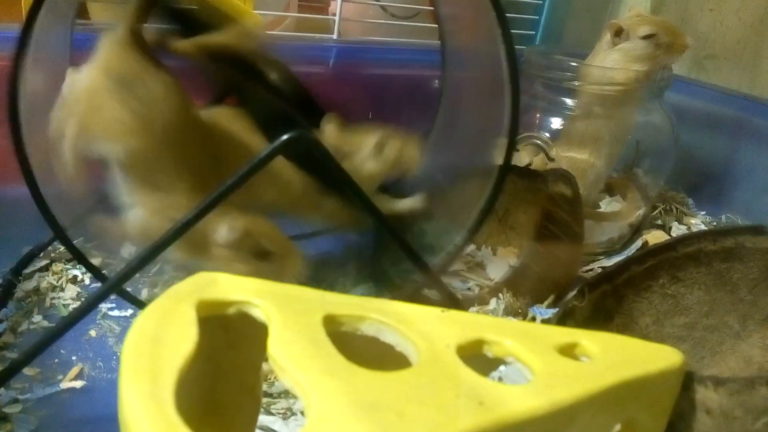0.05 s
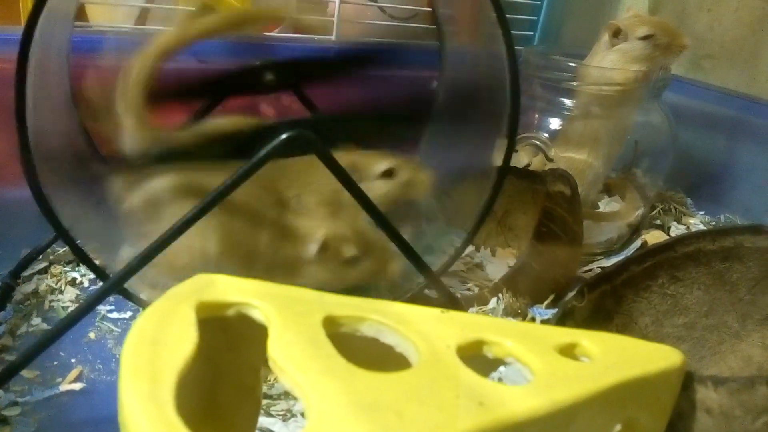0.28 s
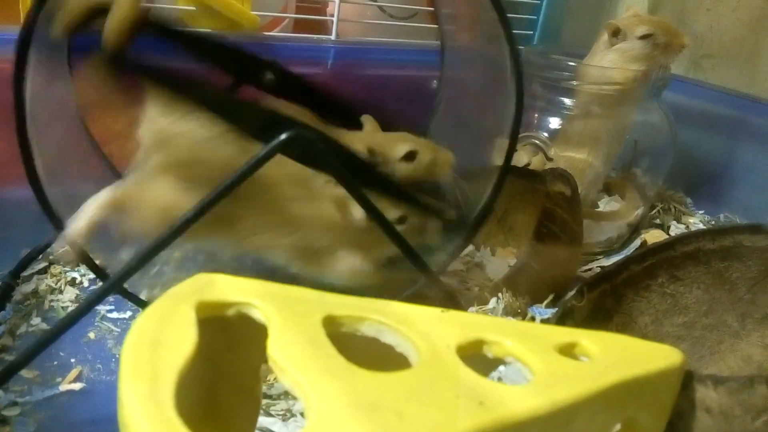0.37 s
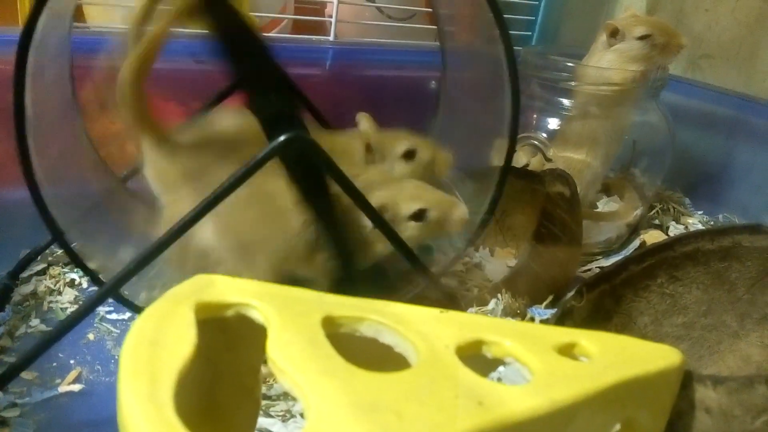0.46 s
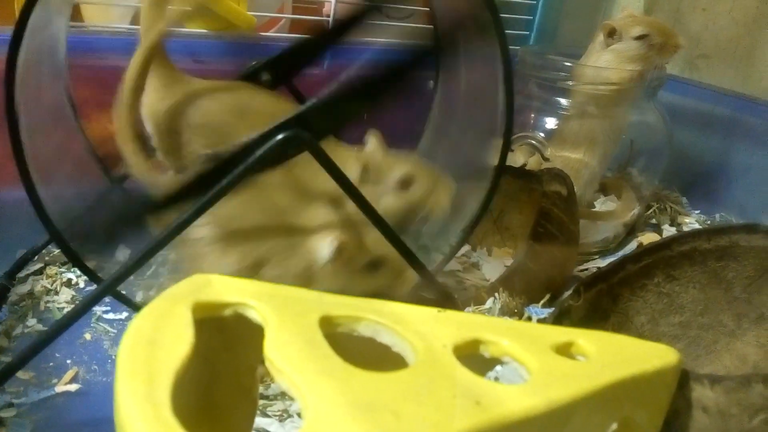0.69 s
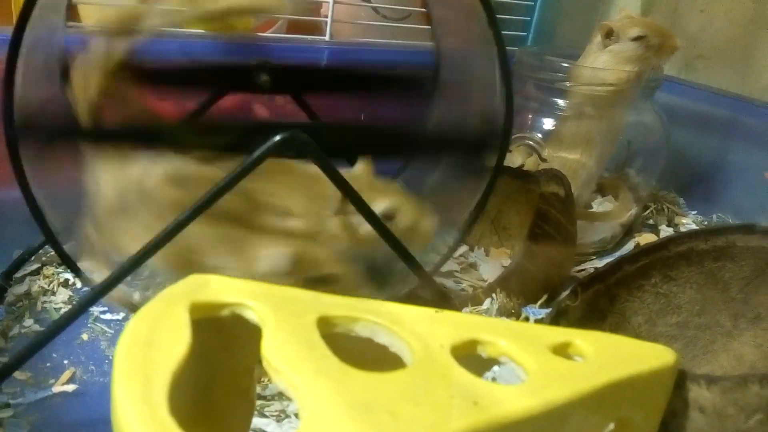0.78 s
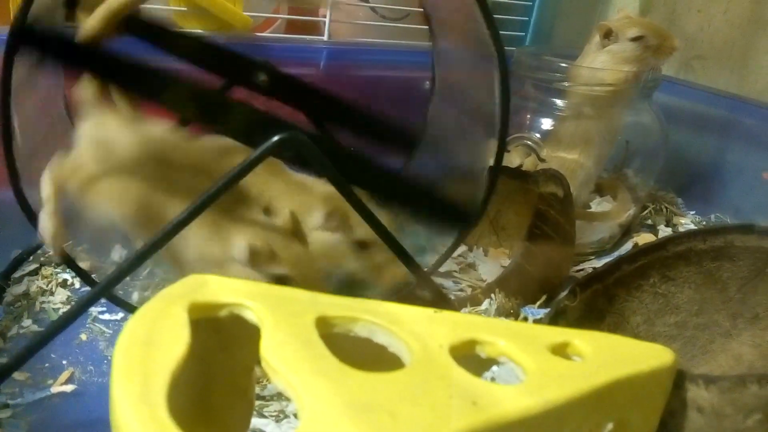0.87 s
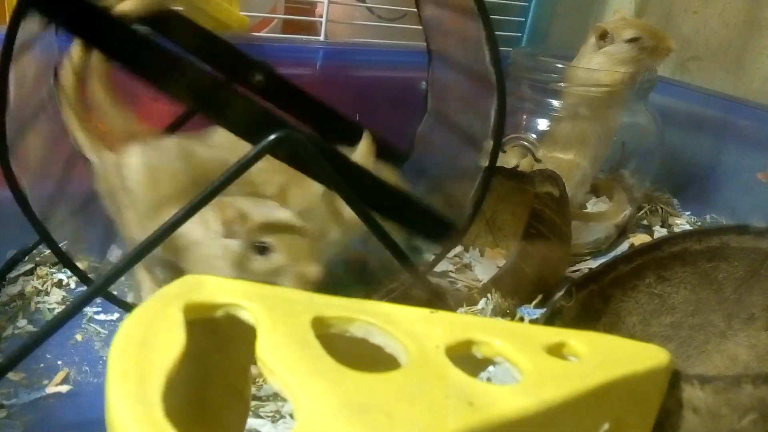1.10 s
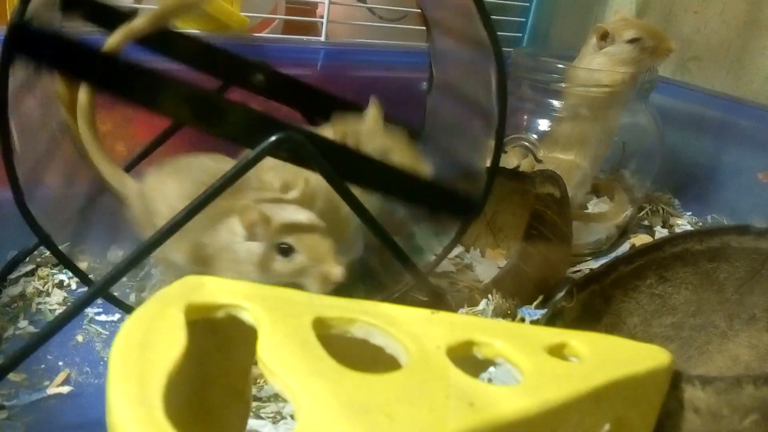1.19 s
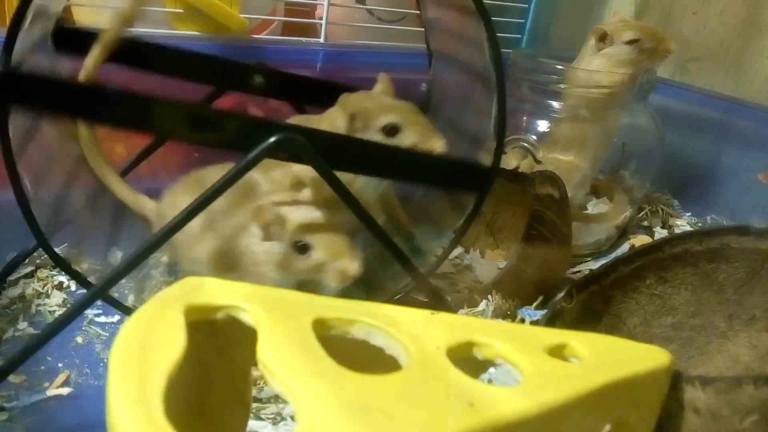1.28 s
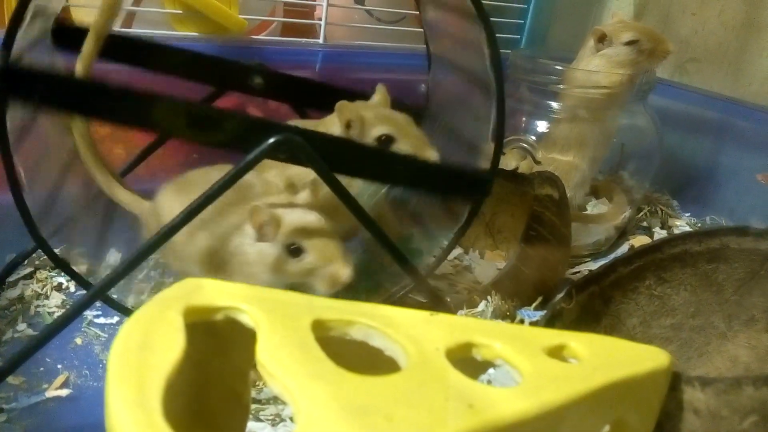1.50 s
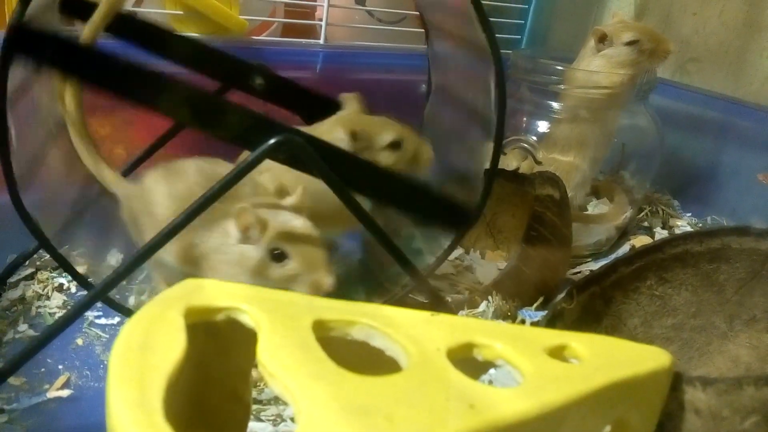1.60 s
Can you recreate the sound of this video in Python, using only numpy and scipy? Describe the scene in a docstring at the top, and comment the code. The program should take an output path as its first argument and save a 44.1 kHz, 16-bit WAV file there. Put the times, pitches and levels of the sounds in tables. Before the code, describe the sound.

One sharp, rattling clack comes from an exercise wheel as gerbils scramble inside it. Soft thumps, faint claw scratches and a faint axle squeal follow, close to the microphone, over steady hiss in a small room.

```python
"""A small, quiet room: gerbils scramble in an exercise wheel inside a cage, heard close up.
The wheel knocks on its wire stand and gives one sharp, chattering clack, a burst of hard contacts
that rings frame and cage. Bodies and paws then thump softly on the drum as the wheel rumbles and slows.
Claws scratch and the rubbing axle squeals faintly, over a steady hiss."""
import sys
import numpy as np
from scipy import signal
from scipy.fft import rfft, irfft
from scipy.io import wavfile

SR = 44100
rng = np.random.default_rng(int(sys.argv[2]) if len(sys.argv) > 2 else 0)


def wav_out(sig):
    """Save sig, one row per channel (or a flat mono array), as 16-bit PCM at SR to the path in sys.argv[1]."""
    wavfile.write(sys.argv[1], SR, np.round(np.clip(np.atleast_2d(sig).T, -1, 1) * 32767).astype(np.int16))


N = 72765
T = np.arange(N) / SR

# Spectra. Each row: frequency in Hz, density in dB per Hz.
HISS_SPECTRUM = [(25, 3.5), (100, -0.5), (250, -1.5), (500, -2), (800, -3), (1500, -1), (2100, -2.5),
                 (4000, -4), (5800, -4.5), (8000, -16), (10500, -15.5), (13000, -20.5), (15500, -22)]
RUMBLE_SPECTRUM = [(60, -38), (110, -5.5), (160, -2.5), (300, -3), (550, -13), (900, -8), (1500, -29.5),
                   (4000, -31), (12000, -45)]
CLAW_SPECTRUM = [(300, 10), (1500, 14), (3500, 9.5), (5800, 8.5), (8500, 1), (10500, 9), (12500, -3),
                 (15500, -15)]
AXLE_RATTLE_SPECTRUM = [(80, -42), (180, -1.5), (550, 4.5), (850, 0), (1250, 5.5), (1800, -10.5),
                        (3600, -7), (7000, -25), (15000, -70)]
RUNG_SPECTRUM = [(150, -17), (250, -8), (500, -1), (800, -4), (1300, 2), (2000, -8), (6000, -20)]
CAGE_SPECTRUM = [(400, -8), (700, -7.5), (1050, -3.5), (1500, -7.5), (2000, -7.5), (3300, -1), (4100, -5.5),
                 (5600, -5), (6600, -9), (8600, -20.5), (10500, -11), (11600, -16.5), (12500, -33),
                 (15500, -40)]
CONTACT_SPECTRUM = [(60, -4), (120, -10), (200, 8), (400, -3.5), (1000, 6), (2000, -12), (3200, 2),
                    (4200, -12.5), (6200, 0.5), (8600, -18.5), (10600, -6.5), (11700, -28.5), (12500, -34),
                    (15500, -63)]
# Wheel modes. Each row: frequency in Hz, level in dB, T60 in seconds.
DRUM_MODES = [(267.7, 1.5, 0.046), (246.2, -16, 0.22), (312, 4.5, 0.022), (395.7, -6, 0.047),
              (471.5, -9.5, 0.067), (697, -5, 0.0394), (1050, -16.5, 0.059), (1316, -23, 0.075)]
FRAME_MODES = [(182.4, 7.5, 0.18), (251, -5.5, 0.32), (339.5, -3.5, 0.18), (401, -6.5, 0.08),
               (474.6, 1, 0.12), (615, -3.5, .24), (828, -7, 0.086), (850, 2, 0.12), (960, 2, 0.2),
               (1278, -4.5, 0.19), (1332, -6, 0.19), (2251, 0, 0.17), (2473, -12, 0.25), (2766, 3, 0.11),
               (2800, -5.5, 0.18), (3200, 1.5, 0.1), (3444, -12, 0.065), (4428, -9, .14), (4700, -7, 0.17),
               (6486, 0, 0.066)]
JOLT_MODES = [(204, -18, 0.055)]
# Cage decay. Each row: frequency in Hz, T60 in seconds.
CAGE_DECAY = [(400, 0.3), (900, 0.29), (2500, 0.21), (6000, 0.2), (11000, 0.12)]
# Rumble envelope. Each row: time in seconds, level in dB.
RUMBLE_ENVELOPE = [(0, -50), (.2, -57.5), (.45, -56), (.65, -67), (.85, -63), (1.1, -70.5), (1.65, -72.5)]
# Axle rubs. Each row: start in seconds, length in seconds, pitch in Hz, level in dB.
AXLE_SQUEALS = [(1.09, .11, 5900, -74), (1.14, 0.14, 4820, -72.5), (1.22, 0.22, 2510, -70.5),
                (0.67, 0.99, 1540, -78.5)]
# Claw skids. Each row: start in seconds, level in dB, T60 in seconds, resonance in Hz.
CLAW_SKIDS = [(0.126, -64.5, .15, 9900), (0.414, -57.5, 0.14, 7700), (0.479, -61, 0.22, 5200),
              (0.621, -56, 0.21, 3060), (0.661, -69, 0.13, 9900), (.878, -62.5, 0.058, 11000),
              (1.099, -51.5, 0.016, 6040), (1.169, -63, 0.23, 4870), (1.601, -58, 0.094, 5300)]
# Axle knocks. Each row: start in seconds, level in dB, lower and upper mode in Hz.
AXLE_KNOCKS = [(.004, -46.5, 806, 1144), (.016, -48, 870, 1099), (0.0389, -34.5, 817, 1039),
               (.048, -48.5, 773, 1118), (.071, -44, 850, 1010), (.149, -58, 804, 1100),
               (.365, -52.5, 968, 1050), (.425, -56, 853, 984), (.525, -60.5, 741, 1063),
               (.645, -57.5, 702, 970), (.69, -57.5, 800, 983), (1.38, -62, 800, 1110),
               (1.428, -52, 783, 1192), (1.446, -55, 727, 1150)]
# Landings on the drum. Each row: start in seconds, level in dB, low-pass cutoff in Hz.
DRUM_THUMPS = [(0.037, -43, 690), (0.098, -42.5, 447), (.108, -37.5, 443), (0.174, -46, 400),
               (0.451, -54, 496), (0.479, -51, 450), (0.686, -58.5, 477), (.764, -44, 506),
               (0.785, -47.5, 303), (0.8252, -26, 366), (0.879, -49, 355), (.955, -49.5, 403),
               (0.98, -57, 400), (1.088, -52.5, 346), (1.1833, -26.5, 850), (1.236, -51.5, 400),
               (1.468, -50.5, 355), (1.489, -57, 300), (1.601, -52.5, 1100)]
# Light bumps, hard contacts. Each row: start in seconds, level in dB.
STAND_BUMPS = [(.416, -76), (0.531, -72), (1.6, -61)]
CLACK_CONTACTS = [(.196, -27), (0.2049, -27), (.2093, -3), (0.2126, 0.5), (0.2151, -0.5), (0.2178, -14)]


def undb(db):
    """Decibels to gain."""
    return 10 ** (np.asarray(db) / 20)


def along(table, hz):
    """Interpolate a table over log frequency."""
    table_hz, values = np.array(table, float).T
    return np.interp(np.log(hz + 1e-3), np.log(table_hz), values)


def bin_gains(spectrum):
    """Gain per FFT bin."""
    return undb(along(spectrum, np.fft.rfftfreq(N, 1 / SR)))


def noise(spectrum):
    """Shaped noise, unit rms."""
    y = irfft(rfft(rng.standard_normal(N)) * bin_gains(spectrum), N)
    return y / y.std()


def rise(tau_s):
    """Exponential attack."""
    return 1 - np.exp(-T / tau_s)


def fade(t60_s):
    """Exponential decay."""
    return undb(-60 * T / t60_s)


def delay(x, start_s):
    """Shift x to start_s."""
    return np.concatenate([np.zeros(int(start_s * SR)), x])[:N]


def ring(modes):
    """Decaying modes after one blow."""
    return sum(undb(db) * fade(t60_s) * np.sin(2 * np.pi * hz * T) for hz, db, t60_s in modes)


def soften(x, cutoff_hz):
    """Low-pass: soft contacts excite little treble."""
    return signal.sosfilt(signal.butter(3, cutoff_hz, fs=SR, output="sos"), x)


def thin(x, cutoff_hz):
    """High-pass: small, light parts radiate little bass."""
    return signal.sosfilt(signal.butter(5, cutoff_hz, "high", fs=SR, output="sos"), x)


def background(hiss_db=-64, whine_db=-78.5, whine_hz=1416):
    """Steady hiss with a faint whine."""
    whine = np.sqrt(2) * np.sin(2 * np.pi * whine_hz * T)
    return undb(hiss_db) * noise(HISS_SPECTRUM) + undb(whine_db) * whine


def room(x, wet_db=-17):
    """Add short reflections from cage and room."""
    tail = delay(rng.standard_normal(N) * fade(t60_s=0.32), start_s=0.012)
    return x + undb(wet_db) * signal.fftconvolve(x, tail / np.linalg.norm(tail))[:N]


def rumble():
    """The rolling wheel quietens as it slows."""
    level_db = np.interp(T, *np.array(RUMBLE_ENVELOPE).T)
    return noise(RUMBLE_SPECTRUM) * undb(level_db)


def squeals(relative_bandwidth=0.0041):
    """The axle rubs: thin, unsteady tones of narrowband noise."""
    out = 0
    for start_s, length_s, hz, db in AXLE_SQUEALS:
        swell = np.sin(np.pi * np.minimum(T / length_s, 1))
        resonance = signal.iirpeak(hz, 1 / relative_bandwidth, fs=SR)
        rub = signal.lfilter(*resonance, rng.standard_normal(N))
        out += undb(db) * delay(swell * rub / rub.std(), start_s)
    return out


def scratches(resonance_db=6):
    """Claws skid over plastic and bedding, each with its own resonance."""
    out = 0
    for start_s, db, t60_s, hz in CLAW_SKIDS:
        grit = noise(CLAW_SPECTRUM)
        grit += undb(resonance_db) * signal.lfilter(*signal.iirpeak(hz, Q=3.3, fs=SR), grit)
        skid = grit / grit.std() * fade(t60_s) * rise(tau_s=0.0013)
        out += undb(db) * delay(skid, start_s)
    return out


def knocks(mode_t60_s=0.15, upper_db=-6, rattle_db=-9):
    """The loose axle knocks and rattles in its stand; two modes shift as the wheel turns."""
    out = 0
    for start_s, db, lower_hz, upper_hz in AXLE_KNOCKS:
        tones = ring([(lower_hz, 0, mode_t60_s), (upper_hz, upper_db, mode_t60_s)])
        rattle = undb(rattle_db) * noise(AXLE_RATTLE_SPECTRUM) * fade(t60_s=0.14)
        out += undb(db) * delay((tones + rattle) * rise(tau_s=0.00041), start_s)
    return out


def bumps():
    """Light bumps rock the stand."""
    stand = soften(ring(FRAME_MODES), cutoff_hz=835)
    return sum(undb(db) * delay(stand, start_s) for start_s, db in STAND_BUMPS)


def thumps(chatter_db=-19.5):
    """Soft bodies and paws land on the drum; its rungs chatter."""
    chatter = undb(chatter_db) * noise(RUNG_SPECTRUM) * fade(t60_s=0.26)
    drum = thin((ring(DRUM_MODES) + chatter) * rise(tau_s=0.0027), cutoff_hz=180)
    return sum(undb(db) * delay(soften(drum, hz), start_s) for start_s, db, hz in DRUM_THUMPS)


def cage(mode_count=700, scatter_db=2.5):
    """Wheel and cage wires ring in dense, uneven modes; high ones die first."""
    jitter, phases = rng.random((mode_count, 2)).T
    modes_hz = 400 + 15000 * ((np.arange(mode_count) + jitter) / mode_count) ** 1.4
    gains = undb(along(CAGE_SPECTRUM, modes_hz) + scatter_db * rng.standard_normal(mode_count))
    gains *= modes_hz ** (1 / 7)  # offsets the wider spacing of high modes
    gains *= np.sqrt(2) / np.linalg.norm(gains)
    t = T[:SR // 2]
    out = 0
    for hz, gain, phase, t60_s in zip(modes_hz, gains, phases, along(CAGE_DECAY, modes_hz)):
        out += gain * undb(-60 * t / t60_s) * np.sin(2 * np.pi * (hz * t + phase))
    return np.pad(out, (0, N - len(out)))


def click():
    """One hard contact: a minimum-phase pulse, unit peak."""
    cepstrum = irfft(np.log(bin_gains(CONTACT_SPECTRUM)), N)
    causal_fold = np.where(T == 0, 1, 2 * (T < T[-1] / 2))
    pulse = irfft(np.exp(rfft(cepstrum * causal_fold)), N)
    return pulse / np.abs(pulse).max()


def clack(click_db=-16.5, crack_db=-15.5, cage_db=-29.5, frame_db=-32.5, jolt_lead_s=0.0033):
    """Hard contacts click, crack and ring the cage; the hardest jolts the wheel and rings its frame."""
    attack = rise(tau_s=0.00023)
    wires = undb(cage_db) * cage()
    pulse = undb(click_db) * click()
    out = 0
    for start_s, db in CLACK_CONTACTS:
        crack = undb(crack_db) * noise(CONTACT_SPECTRUM) * fade(t60_s=0.019)
        out += undb(db) * delay(pulse + attack * (crack + wires), start_s)
    hardest_s = max(CLACK_CONTACTS, key=lambda row: row[1])[0]
    frame = undb(frame_db) * ring(FRAME_MODES) * attack
    jolt = ring(JOLT_MODES) * rise(tau_s=0.0039)
    return out + delay(frame, hardest_s) + delay(jolt, hardest_s - jolt_lead_s)


def scene():
    """Mono mix of all sources."""
    blows = thin(clack() + room(thumps() + bumps() + knocks()), cutoff_hz=163)
    return (blows + scratches() + rumble() + squeals() + background())[None]


def record(dry):
    """Steep low-pass at 15650 Hz."""
    return signal.sosfilt(signal.ellip(10, 0.2, 70, 15650, fs=SR, output="sos"), dry)


dry = scene()
out = record(dry)
wav_out(out)
```